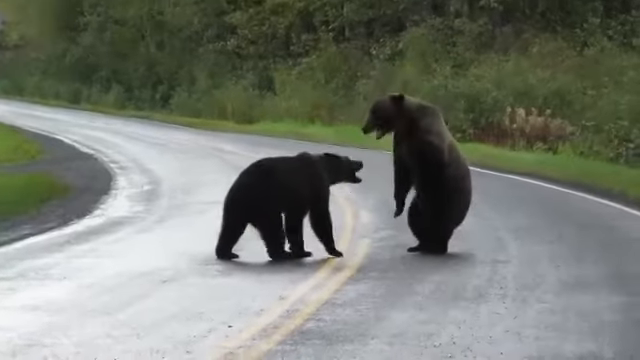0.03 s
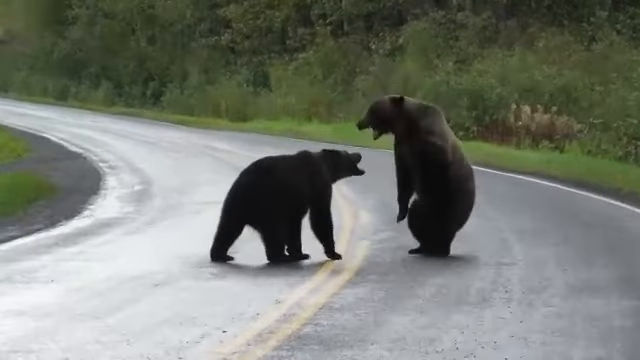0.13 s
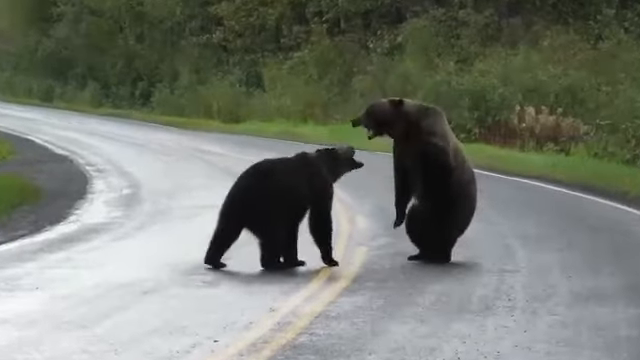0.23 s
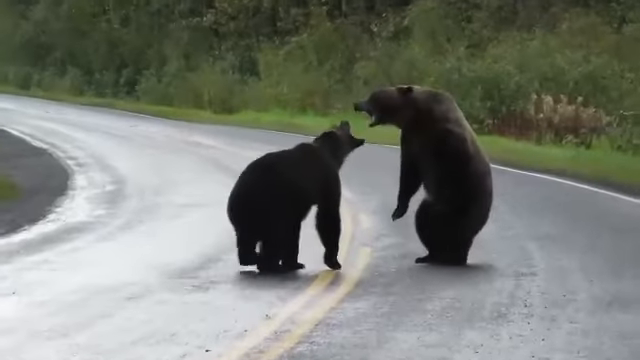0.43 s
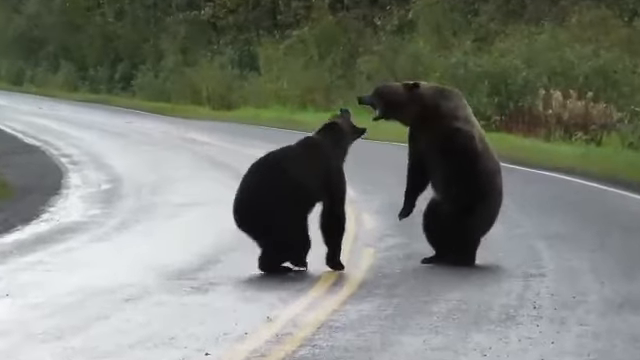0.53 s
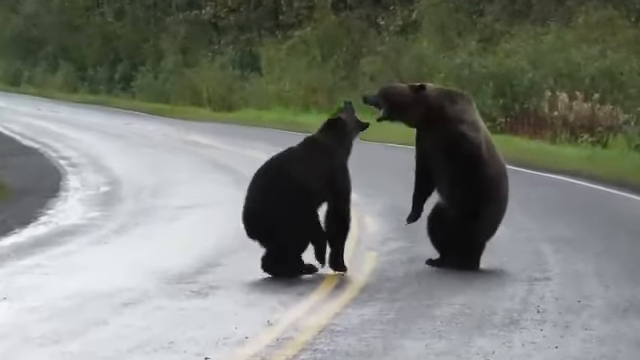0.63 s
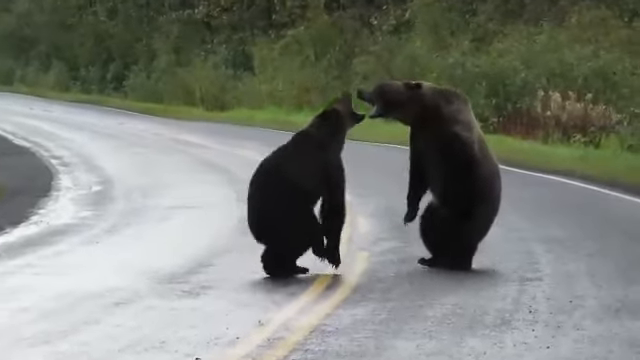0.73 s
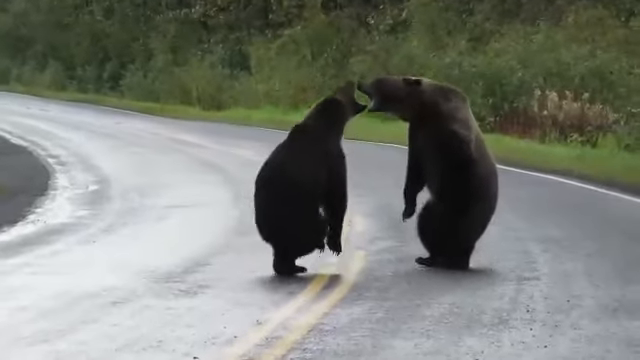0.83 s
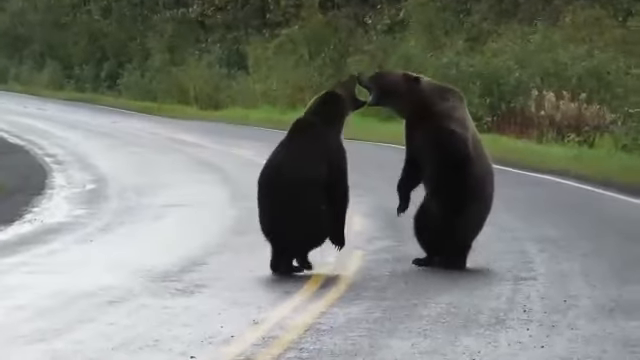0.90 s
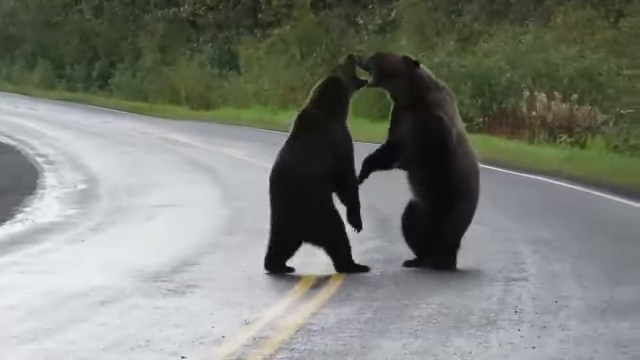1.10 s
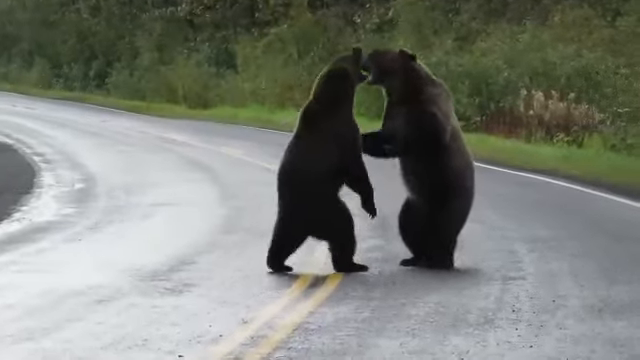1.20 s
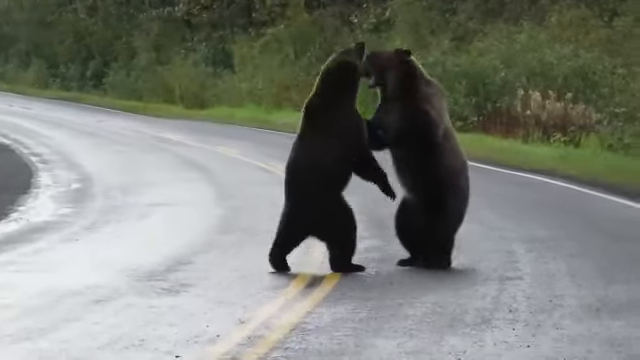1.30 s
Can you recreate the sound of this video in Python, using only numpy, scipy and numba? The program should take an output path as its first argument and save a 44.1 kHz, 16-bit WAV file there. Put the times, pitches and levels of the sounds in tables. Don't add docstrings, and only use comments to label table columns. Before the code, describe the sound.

After tiny clicks, a bear's low, rough roar swells with a second voice beating against it, sinks in pitch and crumbles into slow creaks, with breath hiss, tree echoes and faint outdoor hush, heard by a distant phone.

```python
import sys
import numpy as np
from scipy import signal
from scipy.fft import rfft, irfft
from scipy.io import wavfile
from scipy.ndimage import uniform_filter1d
from numba import njit

SR = 44100
rng = np.random.default_rng(int(sys.argv[2]) if len(sys.argv) > 2 else 0)


def boost(x):
    u = np.asarray(x, float) / 20
    return 10 ** u


def inscribe(sig):
    pcm = np.round(np.clip(np.atleast_2d(sig).T, -1, 1) * 32767)
    wavfile.write(sys.argv[1], SR, pcm.astype(np.int16))


N = 59535

# time_s, pitch_hz
SECOND_BEAR_PITCH = [(.09, 132), (.14, 138), (.24, 138), (.34, 144.5), (.37, 146), (.40, 146.6),
                     (.46, 152.3), (.49, 152.9), (.56, 151.5), (.64, 149.2), (.72, 149.2), (.77, 148),
                     (.82, 143), (.87, 137.5), (.93, 132), (1.0, 130.1), (1.04, 124.5), (1.10, 113)]


def set_rms(x, db):
    return x * boost(db) / np.sqrt(np.mean(x ** 2))


@njit
def svf(x, hz, width):
    y, state_band, state_low = np.empty(len(x)), 0., 0.
    for i in range(len(x)):
        g, k = np.tan(np.pi * hz[i] / SR), width / hz[i]
        v = (state_band + g * (x[i] - state_low)) / (1 + g * (g + k))
        state_band = 2 * v - state_band
        state_low += 2 * g * v
        y[i] = k * v
    return y


def band(x, hz, width):
    hz = np.clip(hz + np.zeros(N), 20, SR * .45)
    once = svf(x, hz, 1. * width)
    return svf(once, hz, 1. * width)


def walk(rate):
    hold = int(SR / rate)
    values = rng.standard_normal(N // 20)[:N // hold + 1]
    smooth = uniform_filter1d(np.repeat(values, hold), hold)
    return 1.3 * uniform_filter1d(smooth, hold)[:N]


def colour(x, table):
    hz, db = np.array(table).T
    bins_hz = np.arange(N // 2 + 1) * SR / N
    gain = boost(np.interp(np.log(bins_hz + 1), np.log(hz), db))
    return irfft(rfft(x) * gain, N)


def resonances(x, table):
    return sum((-1) ** k * boost(db) * band(x, hz, width) for k, (hz, width, db) in enumerate(table))


def bear(pitch, voice, chest, face, throat_width, mouth_width, jitter, shimmer_db, half, rasp, start):
    in_step_s = .489
    t, rows = np.arange(N) / SR, np.array(voice).T
    db, throat_hz, mouth_hz, mouth_db, chest_db, bright_db = (np.interp(t, rows[0], r) for r in rows[1:])
    hz = np.interp(t, *np.array(pitch).T)
    cycles = np.cumsum(hz) / SR
    cycles = cycles - cycles[int(in_step_s * SR)] + start + jitter * walk(60.43)

    at = np.flatnonzero(np.diff(np.floor(cycles)))
    late = cycles[at + 1] % 1 / (cycles[at + 1] - cycles[at])
    shimmer = boost(shimmer_db * rng.standard_normal(400)[:len(at)])
    size = shimmer * (1 + half * (-1.) ** np.arange(len(at)))
    folds = np.zeros(N)
    folds[at], folds[at + 1] = size * late, size * (1 - late)

    puff = np.exp(-(cycles % 1) / 0.35) * rng.standard_normal(N)
    gate = np.clip(np.minimum(t - rows[0, 0], rows[0, -1] - t) / .01, 0, 1)
    source = folds * SR / hz / np.sqrt(2) + rasp * np.sqrt(SR / 300) * puff
    drive = source * boost(db) * gate
    nasal = band(drive, throat_hz, throat_width) - band(boost(mouth_db) * drive, mouth_hz, mouth_width)
    body = resonances(drive * boost(chest_db), chest) + resonances(drive * boost(bright_db), face)
    return nasal, body


def first_bear():
    # time_s, level_db, throat_hz, mouth_hz, mouth_db, chest_db, brightness_db
    voice = [(0.16, -17, 446, 708, -20, -14.5, -31), (0.191, -21.5, 443, 710, -15.5, -21, -26.5),
             (0.211, -19, 459, 720, -11.5, -26.5, -29.5), (0.22, -11.5, 433, 647, -24, -33.5, -29.5),
             (0.284, -12, 453, 668, -13.5, -24.5, -39.5), (0.34, -11, 439, 673, -8.5, -24, -38),
             (.36, -6, 448.5, 645, -25, -28, -31), (0.399, -10, 427, 754, -24, -26.5, -27),
             (.425, -13, 441, 831, -13, -18.5, -32.5), (0.469, -13, 429, 813, -9, -27.5, -42),
             (0.602, -18, 402, 779, -6.5, -22.5, -28), (0.662, -22.5, 379, 584, -2.5, -16, -27),
             (0.721, -25.5, 390, 633, -1, -16.5, -35.5), (.79, -20, 394, 600, -2, -16.5, -25),
             (0.84, -21, 333, 583, -10, -16.5, -43), (0.902, -41.5, 334, 553, 12.5, 13, -26)]
    # time_s, pitch_hz
    pitch = [(.16, 149), (.22, 150.9), (.34, 152.3), (.38, 149.5), (.40, 148), (.46, 143), (.52, 140.9),
             (.58, 138.7), (.66, 133.3), (.72, 127.3), (.77, 126.5), (.82, 123.3), (.92, 109)]
    # pitch_hz, width_hz, level_db
    chest = [(140, 70, 0)]
    face = [(1200, 200, 0)]
    nasal, body = bear(pitch, voice, chest, face, throat_width=78, mouth_width=201, jitter=0.018,
                       shimmer_db=0.88, half=0.016, rasp=0.051, start=0.0013)
    return nasal - svf(nasal, np.full(N, 295.), 170.0) + body


def second_bear():
    # time_s, level_db, throat_hz, mouth_hz, mouth_db, chest_db, brightness_db
    voice = [(0.096, -39, 419, 804, -12.5, 1, -19), (0.112, -29, 404, 807, -16.5, -10.5, -19),
             (.15, -35.5, 420, 790, -10, -14.5, -27), (.162, -43.5, 430, 800, -14, -15, -26.5),
             (.18, -30.5, 450, 809, -17.5, -23.5, -36.5), (0.241, -26.5, 405, 786, -4.5, -40.5, -37),
             (0.342, -30, 405, 862, -13, -26, -17), (0.401, -22, 413, 837, -3.5, -16.5, -14),
             (.50, -18.5, 464, 724, -14, -12, -13.5), (0.629, -18.5, 424, 643, -9.5, -19, -16.5),
             (0.712, -22.5, 437, 837, 2.5, -10, -10.5), (0.772, -21, 443, 676, -14.5, -12, -18.5),
             (0.819, -15, 400, 625, -6.5, -23.5, -24.5), (.87, -22, 402, 583, -2, -12.5, -36),
             (.93, -27.5, 385, 561, 1.5, -10, -25.5), (1.019, -32, 376, 615, 2, 4, -27),
             (1.049, -41.5, 352, 578, 12.5, -1, -36), (1.07, -39.5, 360, 590, -4, 14, -25),
             (1.099, -66, 350, 600, 9, 14, -22)]
    # pitch_hz, width_hz, level_db
    chest = [(128, 150, -10.5), (251, 129, 2)]
    face = [(956, 230, -6.5), (1191, 250, -1.5), (1473, 135, 0), (1853, 180, -7.5), (2940, 250, -22.5),
            (4280, 870, -28.5)]
    nasal, body = bear(SECOND_BEAR_PITCH, voice, chest, face, throat_width=94, mouth_width=218, jitter=0.0074,
                       shimmer_db=2.0, half=0.0085, rasp=0.024, start=0.238)
    return nasal + body


def creaks():
    # start_s, peak_db, ring_hz, ring_length_s
    pulses = [
        (0.0012, -19.5, 320, 0.0021),
        (.0045, -21, 572, 0.0031),
        (1.055, -16, 548, 0.0028),
        (1.073, -13.5, 426, 0.0024),
        (1.108, -15, 480, 0.0039),
        (1.144, -19.5, 548, 0.0054),
        (1.178, -16.5, 482, 0.0083),
        (1.217, -17.5, 501, 0.0051),
        (1.248, -18.5, 478, 0.0066),
        (1.281, -25, 458, 0.0066),
    ]
    rebound_s = 0.013
    out, t = np.zeros(N + 2000), np.arange(2000) / SR
    for s, db, hz, length in pulses:
        ring = np.sin(2 * np.pi * hz * t) * (1 - np.exp(-t / 0.00099)) * np.exp(-(t / length) ** 1.4)
        mouth = 0.14 * np.sin(2 * np.pi * 750 * t) * np.exp(-t / 0.011)
        chest = 0.031 * np.sin(2 * np.pi * 220 * t) * np.exp(-t / 0.0016)
        out[int(s * SR):int(s * SR) + 2000] += boost(db + 1.5) * (ring + mouth + chest)
    return out[:N] + boost(-17) * np.roll(out, int(rebound_s * SR))[:N]


def breath():
    # time_s, rush_db, teeth_hiss_db, palate_rasp_db
    levels = [(0, -39.5, -59.5, -63.5), (.1, -42, -55.5, -85), (.25, -40, -58.5, -71),
              (.40, -32, -52.5, -73.5), (.52, -32, -48.5, -66.5), (.62, -32, -48.5, -58.5),
              (.7, -29, -48, -59.5), (.80, -29.5, -52, -54), (.89, -26.5, -53, -51.5),
              (.925, -28.5, -56.5, -46.5), (.955, -28, -59, -43.5), (0.98, -29.5, -57, -53.5),
              (1.021, -33.5, -59.5, -42.5), (1.05, -34.5, -56, -50.5), (1.09, -31.5, -54, -55),
              (1.15, -35, -66.5, -65.5), (1.35, -54, -90, -87)]
    # pitch_hz, level_db (per Hz)
    rush_colour = [(60, -52.5), (200, -23.5), (330, -2), (550, 5), (900, -20.5), (1600, -11), (2600, -19.5),
                   (6000, -72.5)]
    hiss_colour = [(1470, -25.5), (2500, -4), (2560, -22), (2970, -6.5), (6940, -11.5), (8900, -16),
                   (10200, -25.5), (13200, -17), (15200, -37.5)]
    t, rows = np.arange(N) / SR, np.array(levels).T
    pitch = np.interp(t, *np.array(SECOND_BEAR_PITCH).T)
    puffs = np.exp(0.28 * np.cos(2 * np.pi * np.cumsum(pitch) / SR))

    rush = colour(rng.standard_normal(N), rush_colour)
    hiss = np.zeros(N)
    for hz in 2000 * 1.25 ** np.arange(10):
        hiss += band(rng.standard_normal(N), hz, hz / 3) * boost(2.2 * walk(14)) / np.sqrt(hz)
    hiss = puffs * colour(hiss, hiss_colour)
    rasp = puffs ** 1.3 * band(rng.standard_normal(N), 3150, 520)

    flutter = walk(40)
    out = np.zeros(N)
    for air, db in zip([rush, hiss, rasp], rows[1:]):
        out += set_rms(air, 0) * boost(np.interp(t, rows[0], db) + 0.28 * flutter + 1.5 * walk(25))
    return out


def taps():
    # start_s, peak_db
    ticks = [
        (0.0488, -34),
        (0.1033, -33),
        (0.1062, -37),
        (0.81, -36),
        (0.928, -40),
    ]
    t, noise = np.arange(N) / SR, rng.standard_normal(N)
    shape = sum(boost(db) * (t >= s) * np.exp(-np.abs(t - s) / 0.0024) for s, db in ticks)
    return shape * set_rms(band(noise, 1400., 3300.), -4.5)


def thuds():
    # middle_s, peak_db, pitch_hz, length_s
    steps = [
        (.39, -47, 51, 0.041),
        (0.55, -64, 29, .03),
        (0.51, -51.5, 82, 0.025),
        (0.82, -42, 270, 0.1),
        (.13, -55.5, 30, .04),
        (0.007, -45.5, 95, 0.018),
    ]
    t = np.arange(N) / SR
    out = np.zeros(N)
    for s, db, hz, length in steps:
        out += boost(db) * np.sin(2 * np.pi * hz * (t - s)) * np.exp(-((t - s) / length) ** 2)
    return out


def echo(x):
    t = np.arange(N) / SR
    tail = rng.standard_normal(N) * boost(-60 * t / .6) * (t > .012)
    return signal.fftconvolve(x, tail / np.sqrt(np.sum(tail ** 2)))[:N]


def tree_line(x):
    # delay_s, level_db
    returns = [
        (0.122, -10),
        (.20, -11),
        (.29, -21.5),
    ]
    late = sum(boost(db) * np.pad(x, (int(s * SR), 0))[:N] for s, db in returns)
    return band(late, 1103.0, 1100.0)


def middle_hush():
    # pitch_hz, level_db (per Hz)
    hush_colour = [(30, -42), (100, -13), (250, 0), (600, 2.5), (1200, -7.5), (2500, -18.5), (6000, -34.5),
                   (15000, -51)]
    return set_rms(colour(rng.standard_normal(N), hush_colour), -38.5) * boost(0.77 * walk(9.2))


def wide_hush():
    # pitch_hz, level_db (per Hz)
    wide_colour = [(30, -34.5), (250, -4.5), (600, -6), (1200, -12.5), (2500, -21), (6000, -28.5),
                   (8400, -32), (9000, -45), (12000, -39), (15000, -42)]
    return set_rms(colour(rng.standard_normal(N), wide_colour), -52.5)


def scene():
    # pitch_hz, gain_db
    side_colour = [(60, -42), (200, -30), (700, -19.5), (1300, -15), (2400, -10), (4400, -15.5),
                   (8000, -13), (15000, -12)]
    first, second = first_bear(), second_bear()
    creak, tap = creaks(), taps()
    thin_creak = creak - band(creak, 60., 270.0)
    voices = first + second + thin_creak + tap + breath()
    mid = voices + boost(-18) * echo(voices) + tree_line(voices) + middle_hush() + thuds()

    side = colour(echo(mid), side_colour) * boost(-6.5)
    side += 0.075 * band(first, 440., 200.) + .03 * band(second, 440., 300.)
    side += wide_hush() + boost(-5.5) * tap
    return np.array([mid + side, mid - side])


def band_limit(x):
    return signal.sosfilt(signal.butter(12, 15380, fs=SR, output="sos"), x)


def record(dry):
    narrow_above_db, narrow_hz = -42.5, 2333
    cut = signal.sosfilt(signal.butter(2, 66, "high", fs=SR, output="sos"), dry)
    cut = signal.sosfilt(signal.ellip(8, .2, 70, 15300, fs=SR, output="sos"), cut)
    mid, side = (cut[0] + cut[1]) / 2, (cut[0] - cut[1]) / 2
    treble = uniform_filter1d(band(mid, 2800., 2600.) ** 2, size=3000) / boost(narrow_above_db) ** 2
    low = signal.sosfiltfilt(signal.butter(4, narrow_hz, "low", fs=SR, output="sos"), side)
    high = signal.sosfiltfilt(signal.butter(4, narrow_hz, "high", fs=SR, output="sos"), side)
    side = low + high / (1 + treble ** 3)
    return band_limit(np.array([mid + side, mid - side]))


dry = scene()
out = record(dry)
inscribe(out)
```